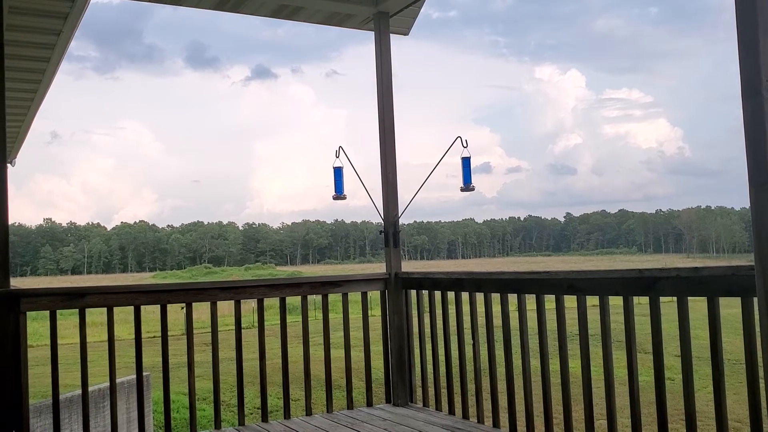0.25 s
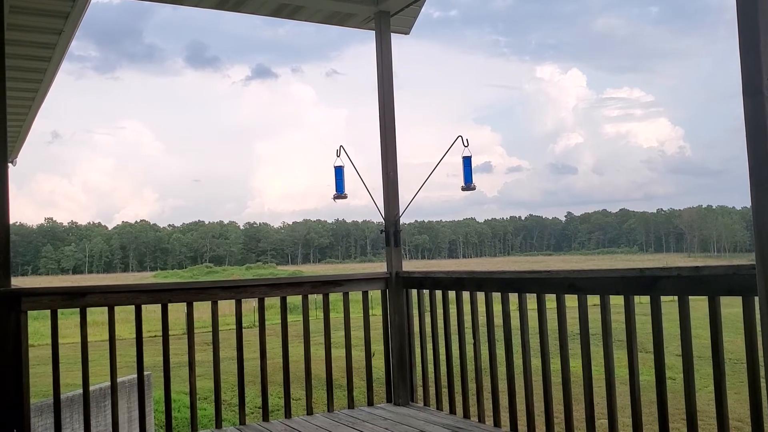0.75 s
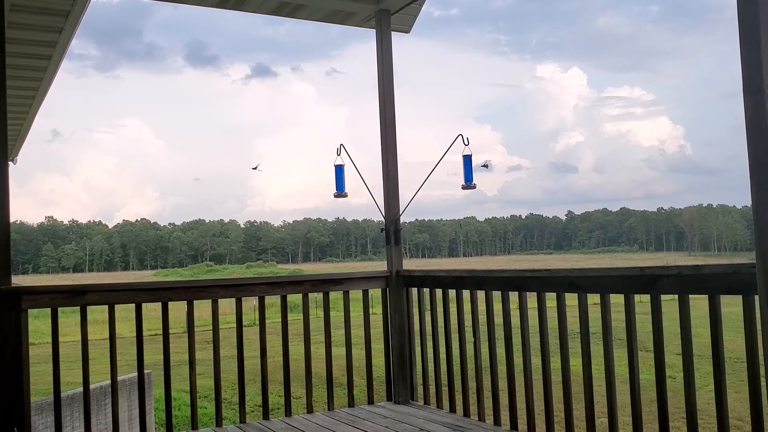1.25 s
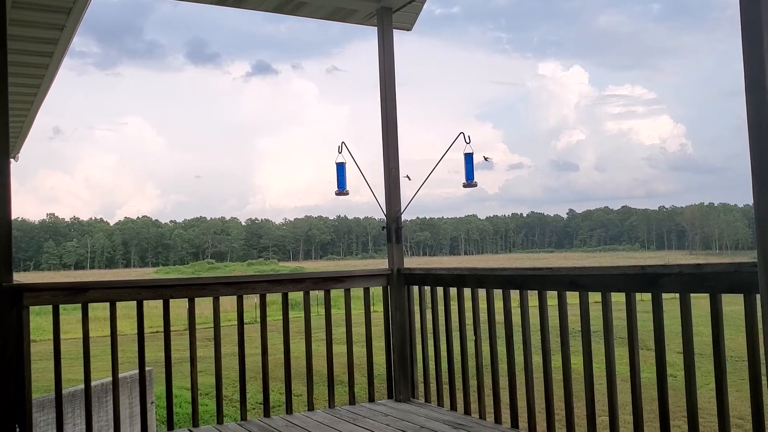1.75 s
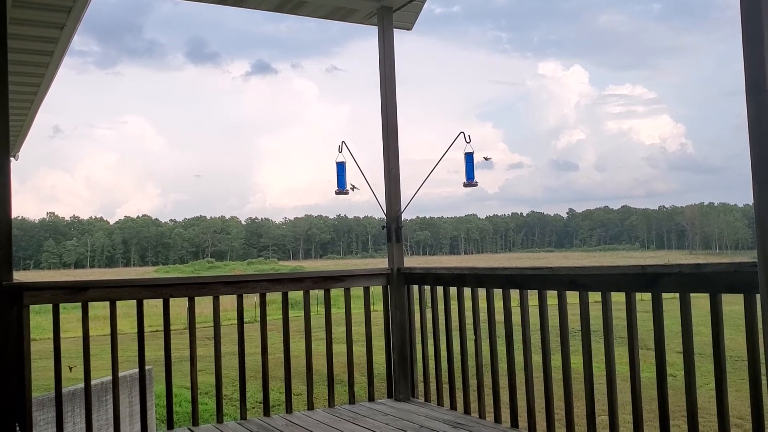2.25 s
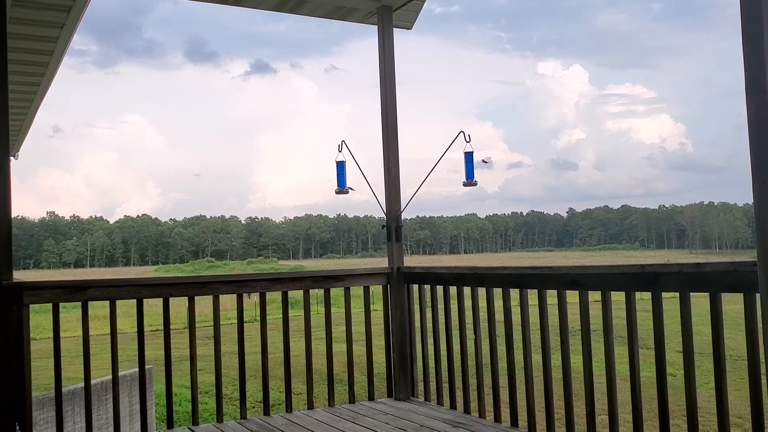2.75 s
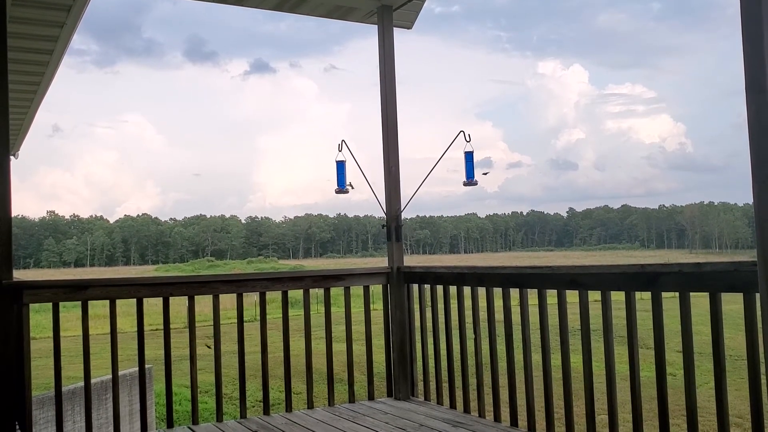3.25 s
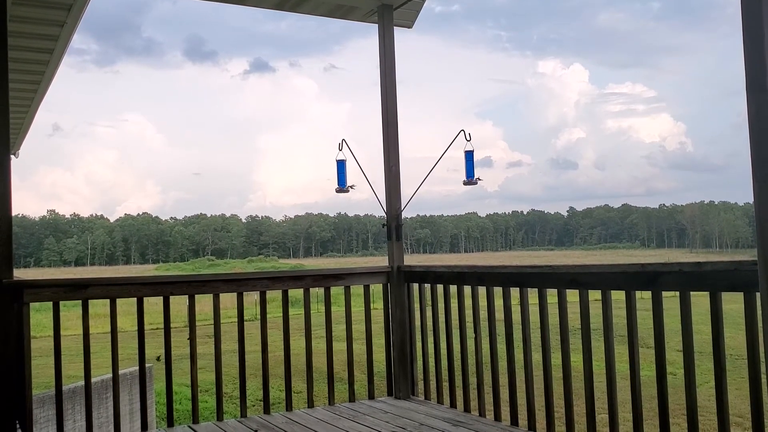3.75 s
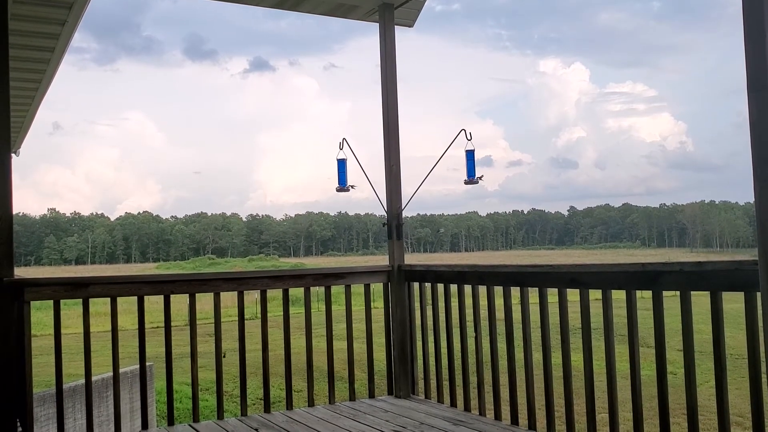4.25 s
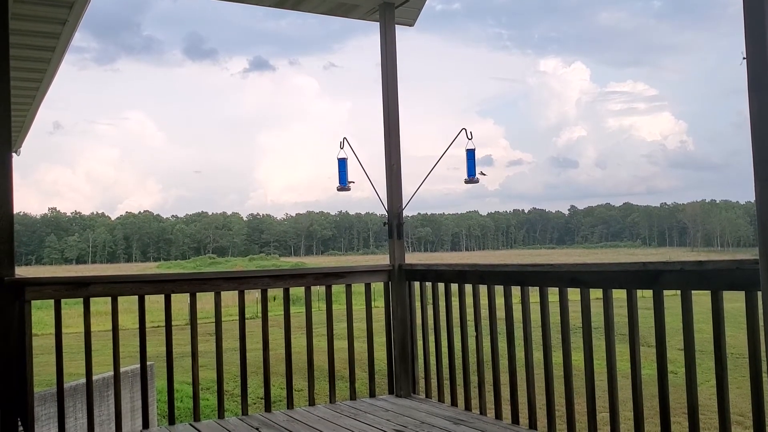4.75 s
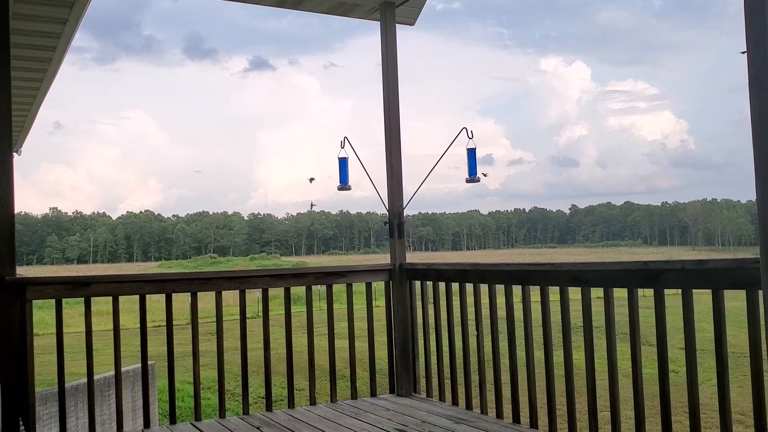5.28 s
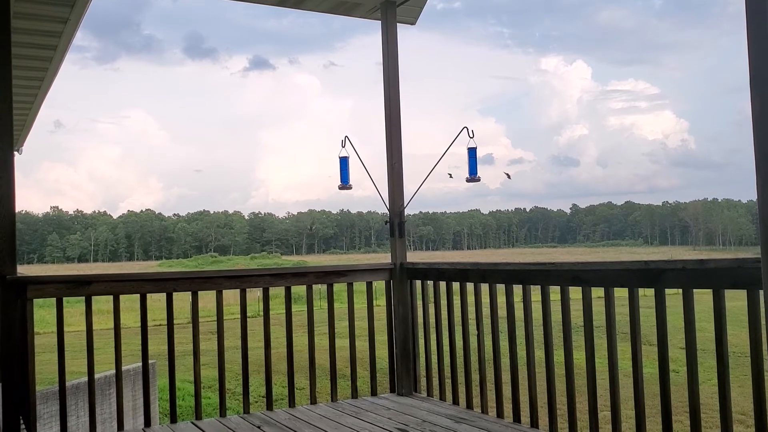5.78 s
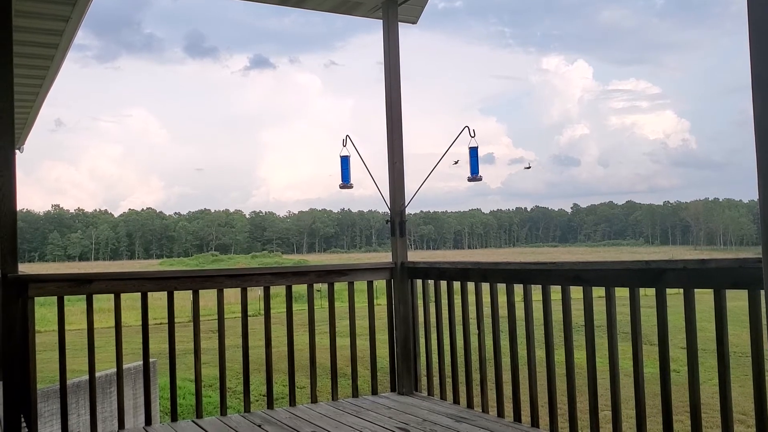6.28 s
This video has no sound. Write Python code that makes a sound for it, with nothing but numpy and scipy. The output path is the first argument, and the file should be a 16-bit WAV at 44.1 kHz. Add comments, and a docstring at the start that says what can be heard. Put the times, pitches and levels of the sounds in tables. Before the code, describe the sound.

Airy outdoor hiss with low wind thuds, mostly on the left, surrounds small birds darting by a porch. Their calls are short, high and scratchy: a wavering whistle, a rough buzz, then evenly spaced chattering notes. A calmer gap holds a soft hollow pop and low wing hum. Another whistle and chatter series follow, then a brighter wing whirr, rising chirps and final chips as the breeze swells.

```python
"""Hummingbirds chatter and whistle round two feeders on a wooden porch above an open field.
Calls are sliding harmonic stacks with flutter and breath, or wavering tones; wings hum in beat overtones.
An insect pips in noise-modulated tone bursts; whisks of noise and one hollow pop pass.
Coloured noise makes the field's hush, swelling with the breeze; short low swings are wind
on a handheld pair of microphones."""
import sys
import numpy as np
from scipy import signal
from scipy.fft import rfft, irfft, next_fast_len
from scipy.io import wavfile
from scipy.ndimage import uniform_filter1d

SR = 44100
rng = np.random.default_rng(int(sys.argv[2]) if len(sys.argv) > 2 else 0)


def nominal_scale(level):
    """Amplitude ratio for a level in decibels (scalar or array-like)."""
    x = np.asarray(level, float) / 20
    return 10 ** x


def materialize(psi):
    """Save the field psi as 16-bit PCM at rate SR to the path in sys.argv[1].

    A 1-D psi becomes a single channel; in a 2-D psi each row is a channel.
    """
    bounded = np.clip(np.atleast_2d(psi).T, -1, 1)
    quanta = np.round(bounded * 32767).astype(np.int16)
    wavfile.write(sys.argv[1], SR, quanta)


N = 287487


def read(points, hz):
    """Columns of a spectrum table, interpolated over log frequency."""
    f, *columns = np.transpose(points)
    return np.array([np.interp(np.log(hz + 1), np.log(f + 1), c) for c in columns])


def evened(x):
    """Scales to rms 1."""
    return x / np.sqrt(np.mean(abs(x) ** 2) + 1e-20)


def add(mix, start_s, sound):
    """Mixes a sound in at start_s, trimmed to the mix."""
    at = round(start_s * SR)
    part = mix[max(at, 0):][:len(sound) + min(at, 0)]
    part += sound[max(-at, 0):][:len(part)]


def flutter(length, width_hz):
    """Complex noise through two equal one-pole lowpasses, wandering at about width_hz; rms 1."""
    settle = 3000
    pole = np.exp(-np.pi * width_hz / SR)
    z = rng.standard_normal((length + settle, 2)) @ [1, 1j]
    for _ in range(2):
        z = signal.lfilter([1], [1, -pole], z)
    return evened(z[settle:])


def wavelet(db, hz, cycles, phase, overtone_db=-21):
    """A few swings under a bell envelope, sharpened by an octave overtone."""
    u = np.arange(-2 * cycles, 2 * cycles, hz / SR)
    turn = 2 * np.pi * (u + phase)
    bell = nominal_scale(db - 16.4 * (u / cycles) ** 2)
    return bell * (np.sin(turn) + nominal_scale(overtone_db) * np.sin(2 * turn))


# field and microphone hiss: f/Hz, left level/dB, right level/dB
HISS = [(29.8, -50, -47.5), (94, -38.5, -40), (150, -55, -50.5), (245, -47.5, -47), (588, -58.5, -58),
        (875, -67.5, -55), (1027, -66.5, -64.5), (1720, -63.5, -56), (3340, -60.5, -55.5),
        (4000, -65.5, -52.5), (7290, -56.5, -56.5), (7885, -44, -55), (8550, -57.5, -54.5),
        (9900, -61, -57.5), (11030, -60, -63), (12670, -52.5, -66), (14700, -44.5, -67),
        (15800, -38.5, -59)]
# left-right likeness: f/Hz, correlation
LIKENESS = [(30, 0.43), (130, 0.99), (290, 0.82), (640, 0.27), (1400, -0.28), (3000, 0.056)]
# breeze swell: t/s, level/dB
BREEZE_SWELL = [(0, -2), (.7, -2.5), (1.7, 0), (3, 0.5), (4, 0), (4.7, 1.5), (5.3, 1.5), (6, 5),
                (6.52, 0.5)]
# share of the breeze dB: f/Hz, left share, right share
RUSTLE_SHARE = [(300, 0.3, 0.5), (1500, 1, 0.66), (4500, 0.59, 0.58), (9600, 0, 0.19), (12200, 0, 0.023)]


def hush():
    """Noise coloured per port; the rustle swells with the breeze in drifting patches, bass is lumpy."""
    hz, t, z = signal.stft(rng.standard_normal((2, N)), SR, nperseg=1024, noverlap=768)
    same = np.clip(read(LIKENESS, hz)[0], -1, 1)[:, None]
    z = np.array([z[0], same * z[0] + np.sqrt(1 - same ** 2) * z[1]])
    patches = uniform_filter1d(rng.standard_normal(z.shape), 14, 1)
    patches = evened(uniform_filter1d(patches, 16, 2))
    lumps = evened(uniform_filter1d(rng.standard_normal((2, 1, len(t))), 10, 2))
    lumps = lumps * (hz[:, None] < 110)
    breeze_db = read(RUSTLE_SHARE, hz)[..., None] * np.interp(t, *np.transpose(BREEZE_SWELL))
    z *= nominal_scale(read(HISS, hz)[..., None] + breeze_db + 1.17 * patches + 4.5 * lumps)
    return signal.istft(z, SR, nperseg=1024, noverlap=768)[1][:, :N]


# strong puffs, left microphone: t/s, level/dB, f/Hz, cycles
STRONG_PUFFS = [(.136, -23, 65, 1.52), (0.17, -33.5, 80, 1), (0.234, -29.5, 73, 1.9),
                (0.461, -38.5, 62, 1.7), (.617, -36, 56.5, 0.91), (1, -31.5, 72.5, 1.1),
                (1.042, -29, 54, 2.6), (1.093, -32, 51.4, 0.87), (3.414, -34, 56.7, 1.1),
                (3.449, -17.5, 60.4, 0.93), (4.209, -41, 78, 1.7), (4.514, -32.5, 53.5, 1.06),
                (4.708, -28, 76.4, 0.86), (4.759, -37.5, 57, 2.1)]
# small chance puffs: t/s, left level/dB, right level/dB
SMALL_PUFFS = [(0, -40, -64), (.8, -48, -54), (1.2, -66, -63.5), (3.25, -62, -66.5), (3.4, -48, -40),
               (3.7, -59, -55), (4.35, -61, -60.5), (4.5, -45.5, -53), (4.9, -41, -50), (5.4, -45.5, -51),
               (5.6, -58, -62)]
PUFF_GAP_S, PUFF_SPREAD_DB = .05, 5
PUFF_HZ, PUFF_CYCLES = (39.5, 61), (0.61, 1.42)  # ranges


def wind():
    """Each puff pushes one diaphragm to and fro; small ones come by chance on either port."""
    out = np.zeros((2, N))
    for s, db, hz, cycles in STRONG_PUFFS:
        add(out[0], s - 2 * cycles / hz, wavelet(db, hz, cycles, rng.random()))
    when, *strength = np.transpose(SMALL_PUFFS)
    slots = np.arange(.1, N / SR, PUFF_GAP_S)
    for port in (0, 1):
        for slot, (late, size, pitch, long, phase) in zip(slots, rng.random((len(slots), 5))):
            s = slot + late * PUFF_GAP_S
            hz = np.interp(pitch, (0, 1), PUFF_HZ)
            cycles = np.interp(long, (0, 1), PUFF_CYCLES)
            db = np.interp(s, when, strength[port]) + PUFF_SPREAD_DB * (2 * size - 1)
            add(out[port], s - 2 * cycles / hz, wavelet(db, hz, cycles, phase))
    return out


# soft hollow pop: t/s, level/dB, f/Hz, cycles
HOLLOW_POP = (2.036, -44, 360, 1.3)


def pop():
    """One short low swing, equal on both ports."""
    s, db, hz, cycles = HOLLOW_POP
    out = np.zeros(N)
    add(out, s - 2 * cycles / hz, wavelet(db, hz, cycles, 0.44, -34))
    return out


# insect bouts: first t/s, last t/s, period/s, level/dB
PIP_BOUTS = [(-.03, 2.9, .322, -54), (3.601, 5.2, .372, -60)]
PIP_HZ, PIP_S, PIP_WIDTH_HZ, PIP_SPREAD_DB = 8980, 0.043, 510, 0.5


def insect():
    """Short buzzy pips on one pitch, flutter-modulated, evenly spaced in each bout."""
    t, out = np.arange(0, PIP_S, 1 / SR), np.zeros(N)
    for first, last, period, db in PIP_BOUTS:
        for s in np.arange(first, last, period):
            tone = np.exp(2j * np.pi * PIP_HZ * t) * (0.71 + 0.62 * flutter(len(t), PIP_WIDTH_HZ))
            pip = tone.real * signal.windows.tukey(len(t), .6)
            add(out, s, nominal_scale(db + PIP_SPREAD_DB * rng.standard_normal()) * pip)
    return out


# dull whisks of air, perhaps wings meeting in the chase: t/s, level/dB, centre f/Hz, width/Hz, length/s
AIR_WHISKS = [(1.143, -65, 654, 344, 0.044), (1.325, -53, 2305, 2500, 0.039)]


def whisks():
    """Short wide puffs of noise, quick to rise."""
    out = np.zeros(N)
    for s, db, hz, width_hz, length_s in AIR_WHISKS:
        u = np.arange(0, 1, 1 / (length_s * SR))
        puff = flutter(len(u), width_hz) * np.exp(2j * np.pi * hz * length_s * u)
        add(out, s, nominal_scale(db) * puff.real * np.sin(np.pi * u ** .5))
    return out


# wing hum: t/s, level/dB, beat f/Hz
WING_BEATS = [(0, -57.5, 45), (1.15, -62, 49), (1.901, -64.5, 43), (2.15, -51, 43), (2.3, -59.5, 43),
              (2.45, -57.5, 43.9), (3.1, -70, 44), (3.6, -52.5, 44.9), (4, -78, 43), (4.9, -67, 46.5),
              (5.2, -56.5, 50), (5.45, -61.5, 47.9), (5.8, -55.5, 50), (5.94, -62.5, 51.7),
              (6.03, -49, 54.8), (6.12, -61, 52.4), (6.27, -62, 44.1), (6.52, -69.5, 43.8)]
WING_LOW_HZ = 109  # small wings radiate little below this
HOVER_HZ, HOVER_TOP_HZ, TOP_PER_BEAT = 43, 177, 36  # faster beats carry higher overtones


def wings():
    """Overtones of the wing beat, each wavering, cut above a corner that rises with the beat."""
    s, *columns = np.transpose(WING_BEATS)
    db, hz = (np.interp(np.arange(N) / SR, s, c) for c in columns)
    top_hz = np.maximum(HOVER_TOP_HZ + TOP_PER_BEAT * (hz - HOVER_HZ), 2 * hz)
    swing, hum = np.exp(2j * np.pi * np.cumsum(hz) / SR), np.zeros(N)
    for k in range(2, 13):
        overtone = (swing ** k * (.5 + .5 * flutter(N, 2.6 * k))).real
        lowpass = 1 / (1 + (k * hz / top_hz) ** 4)
        highpass = 1 / (1 + (WING_LOW_HZ / (k * hz)) ** 4)
        hum += overtone * lowpass * highpass
    return nominal_scale(db) * hum * np.sqrt(hz / top_hz)


# port colour: f/Hz, left level/dB, right level/dB
PORT_COLOUR = [(1270, 2.5, 5.5), (2500, 0, 4), (4000, -1, 12.5), (7000, 7, 7.5), (7880, 8, 0),
               (8640, -4.5, -1.5), (10300, -5.5, -7.5), (15400, 14, -12)]
# porch decay: f/Hz, t60/s
PORCH_T60 = [(1000, 0.25), (3000, 0.26), (7000, 0.24), (14000, 0.15)]
ECHO_DB, LEFT_LAG_S = -1.5, .00036
DIRECT_DB = (-1, 1)  # the left port is shaded by the body


def porch(x):
    """Direct sound, later on the left, then sparse echoes off boards and roof; each port colours both."""
    taps = np.zeros((2, SR // 2))
    at = np.arange(80, SR // 2 - 20, 20)
    at, sign = at + rng.integers(0, 20, (2, len(at))), rng.choice([-1., 1.], (2, len(at)))
    np.put_along_axis(taps, at, sign, 1)
    hz, t, z = signal.stft(taps, SR, nperseg=128)
    decay = nominal_scale(-60 * t / read(PORCH_T60, hz)[0][:, None])
    tail = signal.istft(z * decay, SR, nperseg=128)[1]
    tail *= nominal_scale(ECHO_DB) / np.linalg.norm(tail[0])
    tail[[0, 1], [round(LEFT_LAG_S * SR), 0]] += nominal_scale(np.array(DIRECT_DB))
    size = next_fast_len(N)
    heard = rfft(signal.fftconvolve(x[None], tail, axes=1)[:, :N], size)
    hz = np.fft.rfftfreq(size, 1 / SR)
    return irfft(heard * nominal_scale(read(PORT_COLOUR, hz)), size)[:, :N]


# throat resonance: f/Hz, level/dB
THROAT_GAIN = [(1200, 2), (2400, 5), (3400, 1), (4800, -2), (7000, 8), (9500, 9), (13000, -2)]
# breath in rough notes: f/Hz, level/dB
BREATH_COLOUR = [(1000, -7), (2200, -11), (4000, -1), (6500, -0.5), (9000, -0.5), (12000, -3.5),
                 (15500, -28)]


def chip(db, start_hz, end_hz, length_s, rough):
    """An unsteady syrinx slides in pitch; flutter smears each harmonic and breath fills the gaps."""
    u = np.arange(0, 1, 1 / (length_s * SR))
    rough = np.clip(rough, 0, 1)
    hz = start_hz + (end_hz - start_hz) * u ** 1.4
    turns = np.cumsum(hz) / SR
    # the beak opens and shuts: overtones and breath fill the middle
    opening = np.clip(np.minimum(u / 0.36, (1 - u) / 0.23), .15, 1)
    voice = np.zeros(len(u))
    for k in range(1, 7):
        smear = (1 - rough) ** 2 + rough * flutter(len(u), 650 * k ** 0.57 * (0.18 + rough))
        partial = (smear * np.exp(2j * np.pi * k * turns)).real
        partial = partial * nominal_scale(read(THROAT_GAIN, k * hz)[0]) * (k * hz < 16000)
        voice += partial * (opening if k > 1 else 1)
    bins = np.fft.rfftfreq(len(u), 1 / SR)
    above_pitch = 1 / (1 + (1.03 * end_hz / (bins + 1)) ** 8)
    noise = rfft(rng.standard_normal(len(u)))
    breath = irfft(noise * nominal_scale(read(BREATH_COLOUR, bins)[0]) * above_pitch, len(u))
    note = np.sqrt(1 - rough ** 5) * evened(voice) + rough ** 2.5 * evened(breath) * opening
    return nominal_scale(db - 11) * note * np.sin(np.pi * u ** 1.3) ** 0.47


# lone thin ticks: t/s, level/dB
THIN_TICKS = [(.593, -57), (1.689, -56), (2.721, -48.5), (2.901, -58)]


def ticks():
    """Very short notes falling in pitch."""
    out = np.zeros(N)
    for s, db in THIN_TICKS:
        add(out, s, chip(db, start_hz=6750, end_hz=5470, length_s=0.013, rough=0.51))
    return out


# quick rising slurs: t/s, level/dB
RISING_SLURS = [(6.235, -42), (6.249, -43), (6.265, -54)]


def slurs():
    """Very short, fairly clean notes rising in pitch."""
    out = np.zeros(N)
    for s, db in RISING_SLURS:
        add(out, s, chip(db, start_hz=6750, end_hz=7660, length_s=.012, rough=0.17))
    return out


# held notes: t/s, level/dB, start f/Hz, length/s, roughness 0-1
HELD_BUZZES = [(0.91, -45.5, 6500, 0.086, 0.77), (0.918, -50.5, 2227, .106, 0.92),
               (3.695, -52, 2114, 0.057, .8), (4.288, -41.5, 2560, 0.018, 0.5),
               (4.362, -47.5, 2003, 0.098, 0.87), (4.375, -52.5, 6350, 0.076, 0.4),
               (5.198, -49.5, 2150, 0.071, 0.87), (5.472, -57, 2320, 0.045, 0.9),
               (5.749, -63.5, 5860, 0.37, 0.36), (6.357, -40, 3490, 0.019, 0.52)]


def buzzes():
    """Held notes on a nearly level, slightly falling pitch."""
    out = np.zeros(N)
    for s, db, hz, length_s, rough in HELD_BUZZES:
        add(out, s, chip(db, hz, 0.94 * hz, length_s, rough))
    return out


# whistles: t/s, length/s, start f/Hz, level/dB, octave level re tone/dB
THIN_WHISTLES = [(0.752, 0.11, 6572, -48, -5), (4.013, 0.13, 6630, -49.5, 3), (6.114, .01, 8470, -53, -20),
                 (6.121, 0.042, 7510, -46, -5)]
WHISTLE_RISE_HZ_PER_S = 1920
WHISTLE_PEAK_AT, WHISTLE_START_DB, WHISTLE_END_DB = 0.58, -4.5, -9.5  # the level arches over a peak


def whistle(length_s, start_hz, peak_db, octave_db):
    """A thin wavering tone with its octave, rising as it swells and fades."""
    t = np.arange(0, length_s, 1 / SR)
    wobble_hz = 50 * flutter(len(t), 39.4).real
    hz = start_hz + WHISTLE_RISE_HZ_PER_S * t + wobble_hz
    arch_db = np.interp(t / length_s, [0, WHISTLE_PEAK_AT, 1], [WHISTLE_START_DB, 0, WHISTLE_END_DB])
    swing = np.exp(2j * np.pi * np.cumsum(hz) / SR)
    tone = swing * evened(0.55 + 0.44 * flutter(len(t), 150))
    octave = swing ** 2 * evened(.6 + .6 * flutter(len(t), 240))
    both = (tone + nominal_scale(octave_db) * octave).real
    return nominal_scale(peak_db + arch_db) * both * signal.windows.tukey(len(t), .1)


def whistles():
    """Places each whistle."""
    out = np.zeros(N)
    for s, *row in THIN_WHISTLES:
        add(out, s, whistle(*row))
    return out


# chatter notes: t/s, level/dB, start f/Hz, length/s, roughness 0-1
CHATTER_NOTES = [(1.03, -37.5, 4727, 0.055, 0.92), (1.102, -41, 2990, .031, 0.76),
                 (1.151, -40.5, 2920, 0.029, 0.78), (1.202, -39, 2864, 0.024, 0.63),
                 (1.257, -41, 2863, 0.028, 0.63), (1.32, -39, 2603, .023, 0.75),
                 (1.385, -38.5, 2826, 0.026, 0.53), (1.445, -41.5, 2770, 0.031, 0.64),
                 (1.516, -44, 2644, 0.029, 0.67), (4.206, -48.5, 2810, 0.023, 0.78),
                 (4.527, -44, 2687, 0.022, 0.54), (4.599, -42, 2674, .022, 0.7),
                 (4.685, -42, 2740, 0.0177, 0.52), (4.773, -41.5, 2750, .02, 0.6),
                 (4.854, -44.5, 2654, 0.025, 0.47), (5.135, -50.5, 2380, 0.021, 0.6),
                 (6.267, -48.5, 2500, 0.023, .76), (6.371, -44, 2804, 0.024, 0.63),
                 (6.452, -39.5, 3940, 0.013, 0.6), (6.458, -44, 2905, 0.0257, 0.66)]
CHATTER_FALL_HZ_PER_S = 36000  # mean over a note


def chatter():
    """Rough, steeply falling harmonic stacks."""
    out = np.zeros(N)
    for s, db, hz, length_s, rough in CHATTER_NOTES:
        add(out, s, chip(db, hz, hz - CHATTER_FALL_HZ_PER_S * length_s, length_s, rough))
    return out


def scene():
    """Calls, pips and whisks through the porch; low sounds alike on both ports; wind and hush per port."""
    birds = ticks() + slurs() + buzzes() + whistles() + chatter()
    return hush() + wind() + pop() + wings() + porch(insect() + whisks() + birds)


def top_cut(x):
    """Nothing passes above the cut-off."""
    return signal.sosfilt(signal.butter(12, 17110, fs=SR, output="sos"), x)


def record(dry):
    """Steep linear-phase lowpass at the top of the band."""
    edge = signal.firwin(1023, 15780, window=("kaiser", 9), fs=SR)  # Hz
    mix = signal.oaconvolve(dry, edge[None], "same", axes=1)
    return top_cut(mix)


dry = scene()
out = record(dry)
materialize(out)
```